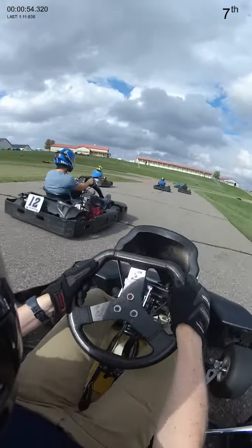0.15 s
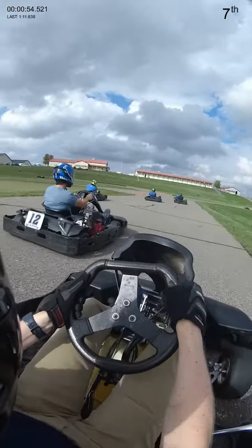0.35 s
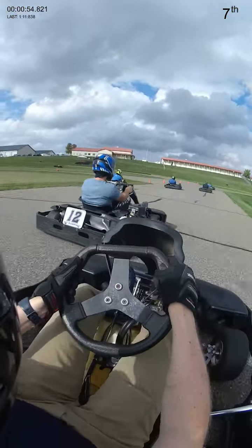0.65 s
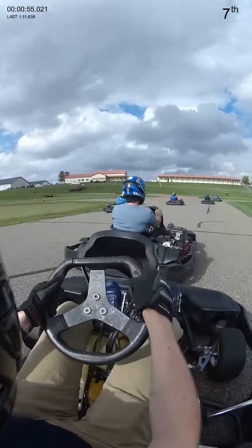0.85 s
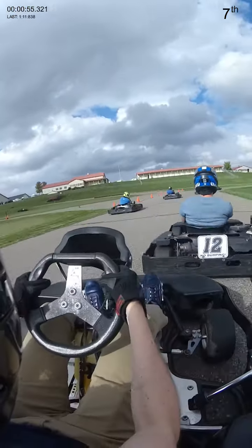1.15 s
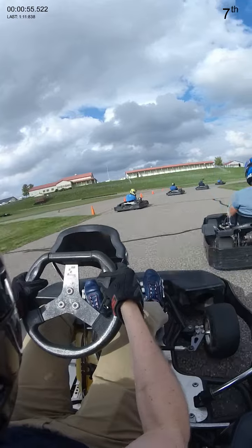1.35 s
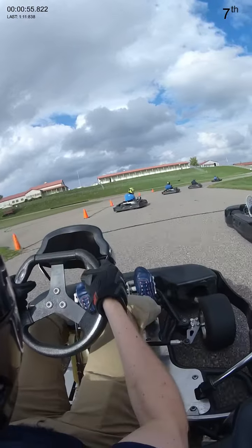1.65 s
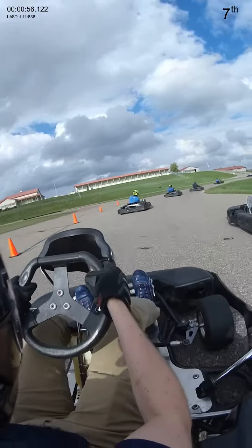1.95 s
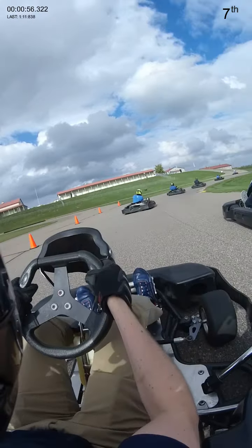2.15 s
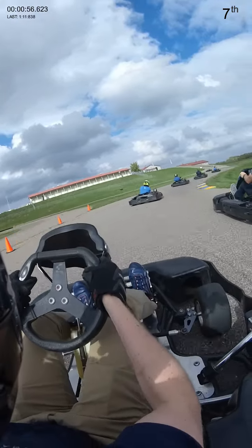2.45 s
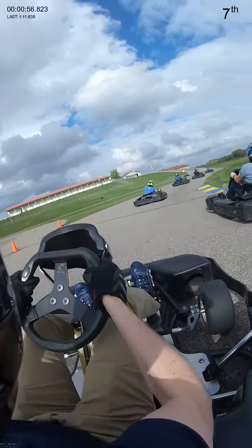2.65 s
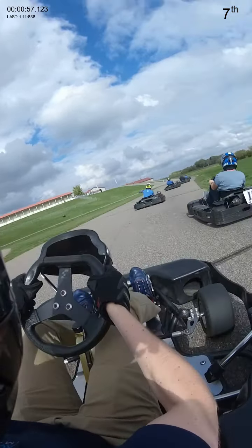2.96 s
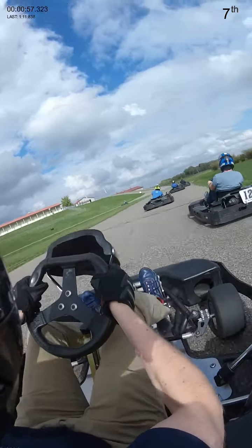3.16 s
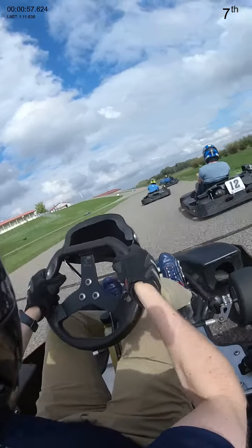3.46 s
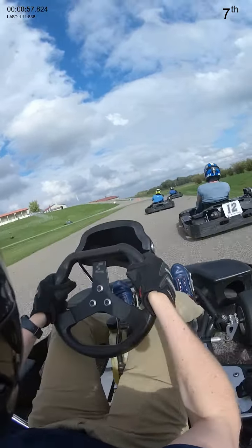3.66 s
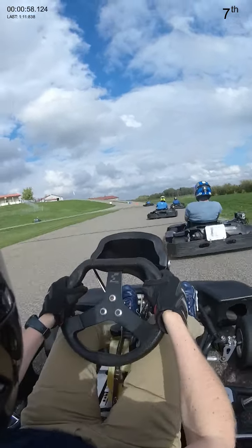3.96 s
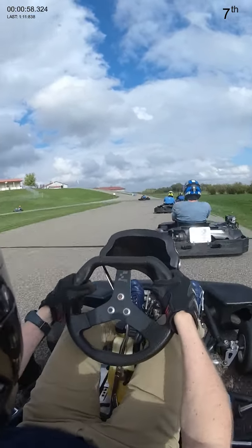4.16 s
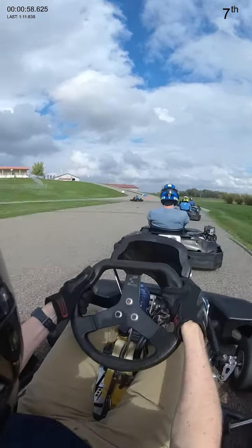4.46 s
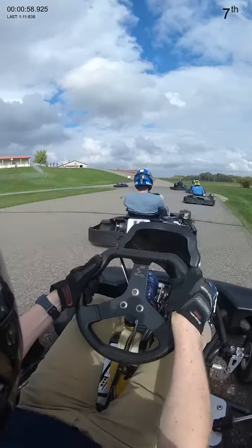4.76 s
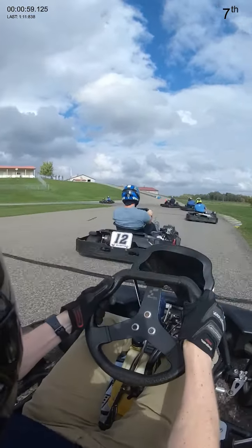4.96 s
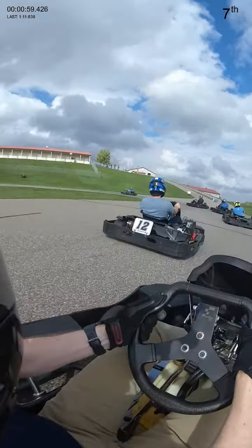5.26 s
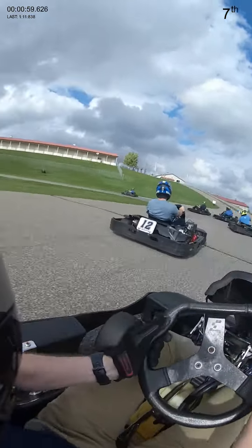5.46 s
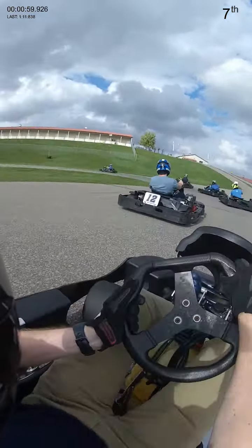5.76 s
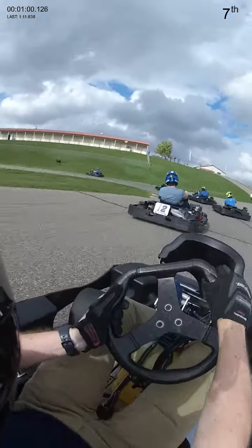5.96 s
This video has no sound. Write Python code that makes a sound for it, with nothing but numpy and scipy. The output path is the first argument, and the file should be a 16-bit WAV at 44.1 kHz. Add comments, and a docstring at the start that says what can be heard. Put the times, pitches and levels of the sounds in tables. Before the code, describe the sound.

A racing go-kart's low engine drone and faint chain whine sit beneath harsh rushing air, with brief whistles and choppy gust dropouts.

```python
"""A four-stroke go-kart at racing speed, heard by a camera microphone on the driver's helmet.
The engine is a blow and a puff of gas per firing, ringing the exhaust; the chain whines in step with it.
Over them, filtered noise is the air tearing past the microphone port, and tones whistle at its edge.
Gusts choke the microphone for an instant. The driver lifts for a corner, slows, and opens the throttle again."""
import sys
import numpy as np
from scipy import signal
from scipy.fft import rfft, irfft
from scipy.io import wavfile

SR = 44100
rng = np.random.default_rng(int(sys.argv[2]) if len(sys.argv) > 2 else 0)


def pcm_store(signal):
    """Save signal as 16-bit PCM."""
    levels = np.round(np.clip(np.atleast_2d(signal), -1, 1) * 32767)
    wavfile.write(sys.argv[1], SR, levels.astype(np.int16).T)


N = 269010
TIME = np.arange(N) / SR  # seconds
BINS = np.fft.rfftfreq(N, 1 / SR)  # Hz

# how hard the eddies press, against the pressure that chokes the microphone: t/s, pressure/ratio
BUFFETING = [(0, 0.77), (.55, .58), (.94, 0.83), (1.02, 0.27), (1.15, 0.86), (2.4, 0.58), (3.6, 0.44),
             (4, 0.95), (4.47, 0.91), (4.52, 0.14), (5.1, .38), (5.3, 1), (5.6, 0.63), (6.1, 0.3)]
# tones at the port's edge: start/s, end/s, level/dB, stage/number (0 low, 1 high)
EDGE_WHISTLES = [(0.015, 0.034, -17.5, 0), (0.087, .102, -21.5, 0), (0.178, 0.195, -19, 0),
                 (0.478, 0.5, -21.5, 0), (0.64, 0.704, -22.5, 0), (0.989, 1.18, -21.5, 0),
                 (1.68, 2.362, -53, 1), (3.463, 3.813, -24.5, 0), (3.876, 3.946, -23.5, 0),
                 (4.011, 4.032, -16.5, 0), (4.235, 4.252, -15.5, 1), (4.502, 4.978, -18.5, 0),
                 (4.993, 5.053, -23, 0), (5.071, 5.103, -18, 0), (5.14, 5.178, -19.5, 0),
                 (5.258, 5.272, -22, 0), (5.322, 5.328, -17, 0), (5.402, 5.412, -26, 0),
                 (5.449, 5.452, -19, 0), (5.471, 5.475, -18, 0), (5.545, 5.557, -20.5, 0)]


def amp(db):
    """Turns decibels into a gain."""
    return 10 ** (np.asarray(db) / 20)


def unit(x):
    """Scales a signal to an rms of one."""
    return x / np.sqrt(np.mean(x ** 2) + 1e-20)


def curves(rows):
    """Joins the points of a table by straight lines: one curve over time per column."""
    s, *columns = np.transpose(rows)
    return [np.interp(TIME, s, c) for c in columns]


def colour(x, points):
    """Filters with the given f/Hz, level/dB outline; the filter answers only after its input."""
    hz, db = np.transpose(points)
    bins_hz = abs(np.fft.fftfreq(8192, 1 / SR))
    log_gain = np.log(amp(np.interp(np.log(bins_hz + 1), np.log(hz), db)))
    # the phase that goes with this outline in a minimum-phase filter
    taps = np.fft.ifft(np.exp(np.conj(signal.hilbert(log_gain)))).real
    return signal.oaconvolve(x, taps[:len(taps) // 2])[:N]


def wander(top_hz, low_hz=1):
    """Random motion with an rms of one, mostly between two rates."""
    band = BINS / (BINS + low_hz) / np.sqrt(1 + (BINS / top_hz) ** 4)
    return unit(irfft(rfft(rng.standard_normal(N)) * band, N))


def air():
    """Level and brightness of the flow in dB; heavy eddies make it louder and duller."""
    # the flow past the port: t/s, level/dB, brightness/dB
    flow_points = [(0, -22.5, -2.5), (.55, -22, -2.5), (.92, -21.5, -1), (1.02, -22, 2), (1.55, -20.5, 3),
                   (2, -21.5, 1), (2.55, -20, 2.3), (3.1, -20, 0.5), (3.62, -21.5, 4.5), (3.95, -20, 0.5),
                   (4.27, -20.5, 2.5), (4.47, -27, -0.5), (4.51, -26, 3.5), (4.83, -24, 6),
                   (4.96, -25, 1.1), (5.16, -24, 0.5), (5.36, -25, -9.5), (5.62, -28.5, -7),
                   (6.1, -24.5, -5)]
    # eddies (below 0 dB: quieter and brighter): middle t/s, half length/s, strength/dB
    surges = [(0.318, 0.029, 3.5), (2.91, 0.3, -0.5), (4.186, .04, 0), (4.332, 0.089, 2),
              (5.526, 0.0476, 4.5), (5.695, 0.014, 3), (5.911, 0.019, 3.5)]
    dulling = 1.7  # dB of brightness lost per dB of surge
    level_db, bright_db = curves(flow_points)
    surge_db = sum(db * np.exp(-((TIME - s) / half) ** 2) for s, half, db in surges)
    return level_db + surge_db, bright_db - dulling * surge_db


def blowing(start, end, fade=.0025):
    """One while an edge tone sounds, with short ramps (fade in s)."""
    return np.clip(.5 + np.minimum(TIME - start, end - TIME) / fade, 0, 1)


def whistling():
    """One while any edge tone sounds, whatever its pitch."""
    return np.minimum(sum(blowing(start, end) for start, end, *_ in EDGE_WHISTLES), 1)


def rush(treble_hz=7200, bass_hz=520, thinning=3.0, air_db=7, eddy_db=2.5, treble_eddy_db=1.2,
         whistle_thinning_db=3):
    """Air shears past the port as noise; bright flow trades bass for treble, and eddies shake it."""
    # colour of the noise: f/Hz, level/dB (per Hz of bandwidth)
    rush_outline = [(20, -25), (60, -28), (130, -8.5), (250, -9), (420, -1.5), (700, 1), (1150, 3.5),
                    (2000, 2.5), (3400, 2), (4900, 2), (6500, -2), (8000, -7), (11000, -12.5),
                    (16000, -19.5)]
    level_db, bright_db = air()
    hiss = unit(colour(rng.standard_normal(N), rush_outline))
    spectrum = rfft(hiss)
    treble = irfft(spectrum * BINS ** 4 / (BINS ** 4 + treble_hz ** 4), N)
    bass = irfft(spectrum / (1 + (BINS / bass_hz) ** 4), N)
    treble_gain = amp(bright_db + treble_eddy_db * wander(35))
    # bright or whistling flow has less bass
    bass_gain = amp(-thinning * np.maximum(bright_db, 0) - whistle_thinning_db * whistling())
    flow = hiss + treble * (treble_gain - 1) + bass * (bass_gain - 1)
    return flow * amp(level_db + air_db + eddy_db * wander(87))


def edge_tone(hz):
    """Sums the edge's few partials along a pitch curve."""
    # partials: multiple of the pitch/ratio, level/dB
    partials = [(1, 5.5), (2, -7), (3, -8)]
    turns = np.cumsum(hz) / SR
    return np.sqrt(2) * sum(amp(db) * np.sin(2 * np.pi * round(k) * turns) for k, db in partials)


def whistles(swell_depth=.45):
    """Vortices shed at the port's edge give a tone whose pitch tumbles with the air."""
    base_hz, bright_db_per_octave, high_stage_ratio = 3760, 20.5, 1.55
    scatter_calm, scatter_per_buffet = 0.0537, 0.159  # shares of the pitch
    sway = .8 * wander(130, 15)
    jitter = .1 * wander(1500, 200)
    swell = 1 + swell_depth * wander(700, 100)
    # turbulence scatters the pitch; brighter flow raises it
    scatter = scatter_calm + scatter_per_buffet * curves(BUFFETING)[0]
    hz = base_hz * 2 ** (air()[1] / bright_db_per_octave) * (1 + scatter * sway + jitter)
    out = np.zeros(N)
    for start, end, db, stage in EDGE_WHISTLES:
        gate = blowing(start, end)
        on = gate > 0
        out[on] += amp(db) * gate[on] * edge_tone(hz[on] * high_stage_ratio ** round(stage))
    return out * swell


def flurries(count=200):
    """Lesser gusts at random, as (middle s, length s): fewer in bright flow or during whistles."""
    rate_per_s, typical_s, length_spread = 20, 0.0043, 0.28
    settled_db, settling_db = 0.37, 0.86  # brightness at which the rate halves, and how gradually
    place, chance, size = rng.random((count, 3)).T
    # one possible gust in each of many equal slots
    at = ((np.arange(count) + place) / count * (N - 1)).astype(int)
    rate = rate_per_s / (1 + np.exp((air()[1][at] - settled_db) / settling_db))
    happens = chance < rate * (1 - whistling()[at]) * N / SR / count
    lengths = typical_s * np.exp(length_spread * (2 * size[happens] - 1))
    return list(zip(TIME[at][happens], lengths))


def choking(gusts, width=0.56):
    """Near one while any of these gusts presses on the diaphragm, with rounded edges."""
    pressed = np.zeros(N)
    for s, length in gusts:
        near = slice(*np.searchsorted(TIME, [s - length, s + length]))
        press = np.exp(-((TIME[near] - s) / (width * length)) ** 8)
        pressed[near] = np.maximum(pressed[near], press)
    return pressed


def headroom(cycle, throb=0.98, slow_hz=220, fast_hz=800, fast_share=0.21, calm=0.27,
             gust_db=-33, flurry_db=-20, leak_db=-30):
    """Gain for the sound that gets through while wind pressure pins the diaphragm against its stop."""
    # the strongest gusts, which choke the microphone: middle t/s, rough length/s
    strong_gusts = [(.0477, 0.0055), (.062, 0.011), (.0866, 0.0035), (0.2178, 0.0062), (.2593, 0.0027),
                    (0.39, 0.0063), (.428, 0.0055), (.4435, 0.0056), (.5042, 0.0063), (0.515, 0.0067),
                    (.547, 0.011), (.616, 0.0047), (.8707, 0.0054), (.9148, 0.0057), (1.7253, 0.0035),
                    (1.7692, 0.0047), (2.1102, 0.0045), (3.8632, 0.0093), (4.121, 0.0095), (4.136, 0.0048),
                    (4.4755, 0.0058), (5.1118, 0.0052), (5.129, 0.0064), (5.2514, 0.0035), (5.3128, 0.0087),
                    (5.338, 0.011), (5.3657, 0.0086), (5.3967, 0.0055), (5.511, .013), (5.5585, 0.0045),
                    (5.6793, 0.007), (5.722, 0.028), (5.842, 0.019), (5.9705, .013)]
    eddies = unit(wander(slow_hz, 19) + fast_share * wander(fast_hz))
    pulse = np.exp(-(cycle % 1) / 0.13)  # the engine shakes the air at each firing
    shaking = eddies + throb * unit(pulse - pulse.mean())
    # whistling flow buffets less
    pressure = curves(BUFFETING)[0] * (1 - calm * whistling()) * shaking
    opening = amp(leak_db) + 1 / (1 + pressure ** 6)  # closes steeply beyond a pressure of one
    gusts_db = np.minimum(gust_db * choking(strong_gusts), flurry_db * choking(flurries()))
    return opening * amp(gusts_db)


def chain(cycle, rattle=0.38):
    """Links meet the sprocket 28 times per firing; slack blurs the whine."""
    # whine: t/s, level/dB, octave above against the whine/dB
    whine_points = [(0, -47, -8), (.6, -34, -19), (1.2, -31.5, -5), (2, -53, -15), (2.8, -28.5, -10),
                    (3.8, -38, -6), (4.5, -28, -7), (4.7, -37, -11), (5.6, -39, -4), (5.78, -30, 6.5),
                    (5.9, -37, 8), (5.99, -27, -6.5), (6.1, -22, -2)]
    level_db, octave_db = curves(whine_points)
    angle = 2 * np.pi * (28 * cycle + .12 * wander(25))
    whine = np.sin(angle) * (1 + rattle * wander(80))
    octave = amp(octave_db) * np.sin(2 * angle) * (1 + rattle * wander(60))
    return amp(level_db) * np.sqrt(2) * (whine + octave)


def engine(cycle, level_db, uneven=0.068, rough=0.14, puff_length=0.063):
    """One blow and one puff of gas per firing ring the exhaust (puff length: share of a firing)."""
    # ring of the exhaust and engine casing: f/Hz, level/dB
    exhaust_outline = [(30, -41), (120, -30.5), (210, -14), (250, -6.5), (295, 3.5), (335, -9.5),
                       (385, 1.5), (440, 7.5), (510, -0.5), (590, 0.5), (680, -25), (1000, 1), (2000, -10),
                       (5000, -14), (16000, -44)]
    fired = np.diff(np.floor(cycle), prepend=0)  # one at each firing, else zero
    blows = unit(fired * (1 + uneven * rng.standard_normal(N)))
    puffs = unit(np.exp(-(cycle % 1) / puff_length) * rng.standard_normal(N))
    ring = unit(colour(blows + rough * puffs, exhaust_outline))
    # the silencer's chambers hold the low notes back, up to 20 ms, and spread each blow
    spread = np.exp(-2j * np.pi * 12 * (1 - np.exp(-BINS / 600)))
    return amp(level_db) * irfft(rfft(ring) * spread, N)


def scene():
    """Kart and wind meet at one microphone, alike in both channels."""
    # how fast the engine fires: t/s, firings per second/Hz
    speed_points = [(0, 39.1), (.3, 39.4), (.7, 40.6), (1, 40.5), (1.7, 42.1), (2.75, 43.7), (3.65, 43.7),
                    (4.38, 42.6), (4.55, 40.3), (5.75, 33.4), (6.1, 32.4)]
    # loudness of the engine as its load changes: t/s, level/dB
    load_points = [(0, -42), (.4, -26.5), (1, -28), (2.4, -28), (3.8, -31.5), (4.38, -30), (4.55, -55.5),
                   (5, -38), (5.8, -41), (5.88, -25.5), (6.1, -29)]
    cycle = np.cumsum(curves(speed_points)[0]) / SR  # firings so far
    sound = engine(cycle, curves(load_points)[0]) + chain(cycle) + rush() + whistles()
    return np.tile(sound * headroom(cycle), (2, 1))


def record(dry, makeup_db=2):
    """Soft overload, a low cut against rumble, and the band limit."""
    # the camera's wind filter: f/Hz, level/dB
    low_cut = [(20, -22), (60, -13.5), (120, -10), (200, -5), (290, -1), (16000, -0.5)]
    ceiling, top_hz = .62, 15950
    squashed = amp(makeup_db) * ceiling * np.tanh(dry / ceiling)
    thinned = np.array([colour(channel, low_cut) for channel in squashed])
    band_limit = signal.firwin(511, top_hz, window=("kaiser", 9), fs=SR)
    return signal.oaconvolve(thinned, band_limit[None], "same")


dry = scene()
out = record(dry)
pcm_store(out)
```